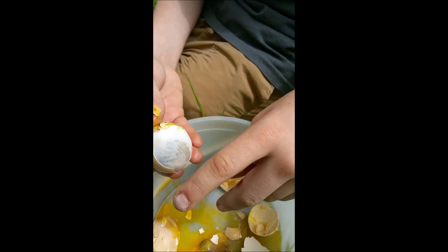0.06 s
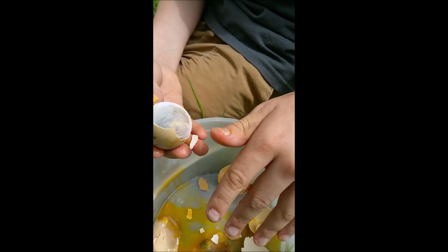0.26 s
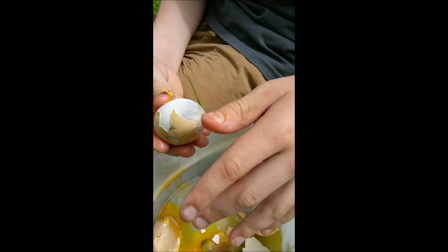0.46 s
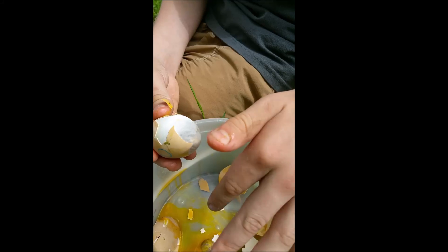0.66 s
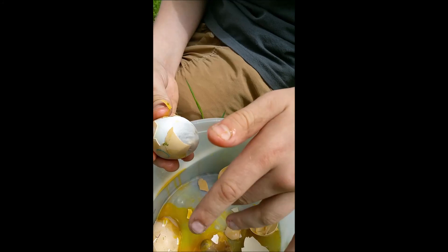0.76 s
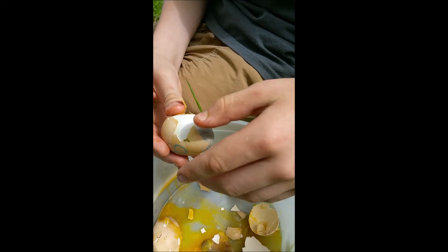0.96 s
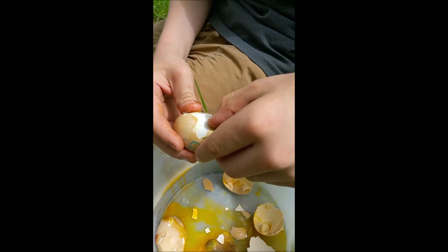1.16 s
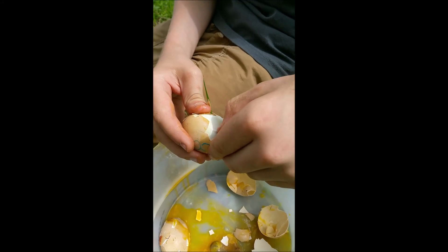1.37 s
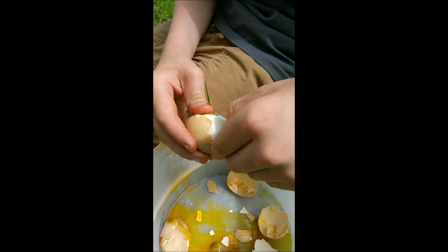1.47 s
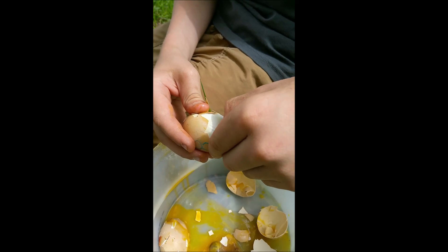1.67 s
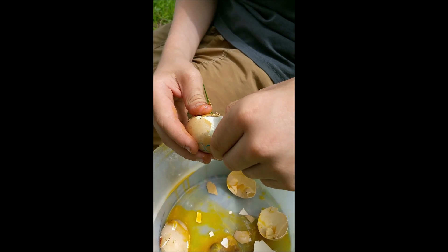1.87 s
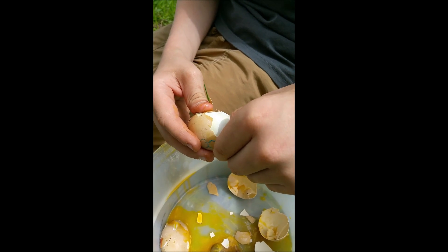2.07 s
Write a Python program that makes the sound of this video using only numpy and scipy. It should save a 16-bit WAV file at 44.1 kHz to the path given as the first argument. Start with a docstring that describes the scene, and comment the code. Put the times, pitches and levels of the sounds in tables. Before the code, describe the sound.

An egg being peeled by hand: one sharp knock and fading rattle of shell in a plastic bowl, a crisp cluster of cracks, faint ticks, then more fine crackling; close stereo phone microphone, quiet outdoors.

```python
"""Fingers drop a piece of eggshell that bounces and rattles in a plastic bowl, then crack and pick bits off an egg.
Outdoors, a phone's stereo microphone close by: bowl, shell and egg are decaying modes, struck by brief
contacts and sprays of tiny fractures. Crumbs slide and crunch; thumps and rings go with the cracks. Beneath
lie far traffic rumble, hum, a soft rustle and microphone hiss made of shaped noise, faint gliding bird
chirps and a breathy whistle of narrow noise bands."""
import sys
import numpy as np
from scipy import signal
from scipy.fft import rfft, irfft
from scipy.io import wavfile
from scipy.ndimage import uniform_filter1d

SR = 44100
rng = np.random.default_rng(int(sys.argv[2]) if len(sys.argv) > 2 else 0)


def ratio(d):
    """dB to gain"""
    e = np.asarray(d, float) / 20
    return 10 ** e


def dump(signal):
    """Clip the signal to [-1, 1] and save it as 16-bit WAV at the path in sys.argv[1]."""
    limited = np.clip(np.atleast_2d(signal).T, -1, 1)
    pcm = np.round(limited * 32767).astype(np.int16)
    wavfile.write(sys.argv[1], SR, pcm)


N = 92610
TIME = np.arange(N) / SR
SIDES = np.array([[.5], [-.5]])  # left, right: shares out a left-minus-right level in dB


def unit(x):
    """Scale to rms 1."""
    return x / np.sqrt(np.mean(x ** 2))


def curve(rows, at, log=False):
    """Read a two-column table at given places, on a log axis if asked."""
    places, values = np.array(rows, float).T
    if log:
        return np.interp(np.log(at + 1), np.log(places + 1), values)
    return np.interp(at, places, values)


def ring(push, hz, t60):
    """One mode struck by a push: it decays by 60 dB in t60 seconds."""
    pole = np.exp(2j * np.pi * min(hz, .45 * SR) / SR - np.log(1000) / (t60 * SR))
    return signal.lfilter([1], [1, -pole], push).imag


def band(hz, width_hz):
    """Noise through a resonance, rms 1."""
    return unit(signal.lfilter(*signal.iirpeak(hz, hz / width_hz, SR), rng.standard_normal(N)))


def walk(rate_hz):
    """Slow random wander, spread 1: noise averaged twice."""
    k = int(SR / rate_hz)
    return unit(uniform_filter1d(uniform_filter1d(rng.standard_normal(N), k), k))


def add(out, start_s, sound, left_lag_s):
    """Mix in a two-channel sound, the left a little later."""
    for side, lag_s in enumerate((left_lag_s, 0)):
        i = int(round((start_s + lag_s) * SR))
        n = min(sound.shape[1], N - i)
        out[side, i:i + n] += sound[side, :n]


# spectrum of far rumble and hiss: pitch_hz, relative level_db (per Hz)
FAR_SPECTRUM = [(13, -49.5), (22, -14), (83, -3.5), (171, -8), (202, -19), (289, -13.5), (323, -38),
                (426, -19.5), (806, -26.5), (3500, -38), (5300, -38.5), (15600, -42.5), (16500, -58.5)]
# likeness of the two microphone sides: pitch_hz, correlation (0-1; below 0 is taken as 0)
FAR_LIKENESS = [(60, 0.91), (130, 0.88), (290, 0.67), (640, 0.43), (1410, -0.01), (3100, -0.08),
                (6820, -0.02), (15000, -0.01)]
# tilt of the far sound to one side: pitch_hz, left_minus_right_db
FAR_BALANCE_ROWS = [(60, 1.5), (110, 1.0), (200, 0.5), (380, -0.5), (700, 0.5), (1290, 0.5), (2380, 2.0),
                    (4400, 0.0), (8120, 2.0), (15000, 1.5)]
# steady hum lines: pitch_hz, level_db
HUM_LINES = [(285.3, -77), (339.1, -80), (430.7, -74.5), (484.5, -83.5)]
# rustle of hands and leaves: time_s, level_db
RUSTLE_LEVEL = [(0, -71.5), (.2, -74), (.33, -69.5), (.6, -74.5), (.85, -72.5), (1.1, -73), (1.33, -73),
                (1.5, -74.5), (1.65, -79.5), (1.95, -80.5), (2.1, -65)]
FAR_DB, HUM_WIDTH_HZ = -60.5, 7.3
RUSTLE_HZ, RUSTLE_WIDTH_HZ = 1800, 1500


def distance():
    """Rumble alike on both sides, hiss unrelated; wavering hum lines and a soft rustle."""
    hz = np.arange(N // 2 + 1) * SR / N
    like = np.clip(curve(FAR_LIKENESS, hz, True), 0, 1)
    # more mid than side noise makes left and right alike
    mid = rfft(rng.standard_normal(N)) * np.sqrt(1 + like)
    side = rfft(rng.standard_normal(N)) * np.sqrt(1 - like)
    shape_db = curve(FAR_SPECTRUM, hz, True) + SIDES * curve(FAR_BALANCE_ROWS, hz, True)
    far = unit(irfft((mid + 2 * SIDES * side) * ratio(shape_db), N))
    hum = sum(ratio(db) * band(pitch_hz, HUM_WIDTH_HZ) for pitch_hz, db in HUM_LINES)
    rustle_noise = np.array([band(RUSTLE_HZ, RUSTLE_WIDTH_HZ) for _ in SIDES])
    rustle = rustle_noise * ratio(curve(RUSTLE_LEVEL, TIME) + 0.5 * walk(28))
    return ratio(FAR_DB) * far + hum + rustle


GRAINS_PER_S, GRAIN_SPREAD_DB = 6900, 5.5
GRAIN_CAP = 2.2  # no fracture rises above the smallest by more than this many spreads


def crackle(t, t60, smallest_db):
    """One snap, then a fading spray of smaller fractures at random instants."""
    chance, sign, size = rng.random((3, len(t)))
    rise_db = GRAIN_SPREAD_DB * np.minimum(-np.log(1 - size), GRAIN_CAP)
    grains = (chance < GRAINS_PER_S / SR) * np.sign(sign - .5) * ratio(smallest_db + rise_db)
    return grains * ratio(-60 * t / t60) + (t == 0)


PIECE_DETUNE, PIECE_SPREAD_DB = .03, 2  # random spread of pitch (as a fraction) and of level on each side


def piece(push, modes, tilt_db=0):
    """Modes of one bit of shell, each bit tuned and turned differently; energy of rms 1 held for 5 ms."""
    draws = rng.standard_normal((len(modes), 3))
    sound = 0
    for k, ((hz, db, t60, pan_db), draw) in enumerate(zip(modes, draws)):
        tilted_db = db + tilt_db * np.log2(hz / 3000)
        gain = ratio(tilted_db + pan_db * SIDES + PIECE_SPREAD_DB * draw[1:, None])
        sound = sound + (-1) ** k * gain * ring(push, hz * (1 + PIECE_DETUNE * draw[0]), t60)
    return sound / np.sqrt(np.sum(sound ** 2) / SR / .01)  # 5 ms on each of two sides


# shell piece hitting the bowl: start_s, level_db, deep_ring_db, tick_db, left_minus_right_db (of the bowl)
SHELL_BOUNCES = [(0.2287, -21, 2, -5.5, 5), (.2410, -14, -19, -13, -1), (0.245, -26.5, -22.5, -4, 4),
                 (0.3449, -42.5, -13, -5, 7), (0.3537, -32.5, -28, -4, -3), (0.3647, -27, -35, -10, 1.5),
                 (0.3783, -39.5, -24, -7, -5), (0.3952, -45, -20, -13, 2), (0.403, -35.5, -18, -20, 2),
                 (0.4051, -38.5, -32, -7, 4), (0.418, -44.5, -9, -18, 0), (0.4244, -45.5, -10, -16.5, 0),
                 (0.4355, -40, -12, -10, 3), (0.4424, -48.5, -12, -15, 1), (0.4696, -47.5, -12, -23, 1),
                 (0.4963, -51, -12, -23, 2), (.5104, -53, -13, -29, 3), (.517, -61, -10, -29, 2),
                 (0.527, -54.5, -16, -28.5, 3), (0.5343, -56.5, -15, -30, 1), (.545, -58, -12, -30, 0),
                 (0.5523, -60.5, -12, -30, -2)]
# modes of the plastic bowl: pitch_hz, level_db, t60_s
BOWL_MODES = [(529, -12, .05), (1151, 3.5, 0.023), (1346, -9, 0.014), (1598, -5.5, 0.014),
              (1860, -5, 0.021), (2210, -14.5, 0.0091), (2302, -18.5, .015), (2733, -3, .012),
              (3680, -5, 0.0033), (3800, -10, 0.029)]
# deep bowl modes, as strong as the blow is central: pitch_hz, level_db, t60_s
BOWL_DEEP_MODES = [(495, -2.5, 0.012), (630, -0.5, 0.022), (860.5, -7, 0.014)]
# brief ringing of shell and fingers, also in crumbs and cracks: pitch_hz, relative level_db, t60_s,
# left_minus_right_db
SHELL_MODES = [(1509, -5.5, 0.0091, -6), (1820, -3.5, 0.0079, 2.5), (2350, 1.5, 0.0055, 2.5),
               (2863, 0, 0.0085, 0), (3517, 1, 0.0079, -0.5), (4260, 4.5, .004, -6),
               (4956, 7.5, 0.0039, -2), (5700, 4.5, 0.0031, -18.5), (6760, 5.5, 0.0019, -22),
               (7010, 4, 0.0034, -6.5)]
# spit into the air, also in cracks: pitch_hz, relative level_db, t60_s, left_minus_right_db
AIR_MODES = [(7970, 0.14, 0.00078, -1), (10160, 0.023, 0.0016, 0.5), (12270, 0.91, 0.0017, -2.5),
             (13800, 0.96, 0.0015, -2.5), (15200, 0.9, 0.0014, -3)]
CONTACT_AT_0_DB_S = 0.00019
SOFTENING = .2  # contact lasts as blow strength to the minus this power
TICK_T60_S, SCRAPE_T60_S = 0.0069, 0.026
GRAIN_DB, SCRAPE_DB, RATTLE_DB = -7.5, -16.5, -12  # smallest tick and scrape fractures; their push on the bowl
TICK_TILT_DB = -3  # per octave
TICK_AIR_DB = -3.5
AIR_FADE = .3  # dB of air lost per dB that a bounce is weaker
BOWL_LAG_S, SHELL_LAG_S, AIR_LAG_S = .0001, .00005, .00002  # the left side hears each this much later


def bowl():
    """Each bounce pushes the bowl's modes; the light shell ticks and scrapes on top."""
    out, t = np.zeros((2, N)), TIME[:6000]
    for start_s, db, deep_db, tick_db, pan_db in SHELL_BOUNCES:
        contact_s = CONTACT_AT_0_DB_S * ratio(-SOFTENING * db)
        touch = np.sin(np.pi * np.arange(0, contact_s, 1 / SR) / contact_s)
        snap = crackle(t, TICK_T60_S, GRAIN_DB) + crackle(t, SCRAPE_T60_S, SCRAPE_DB)
        blow_and_rattle = (t == 0) + ratio(RATTLE_DB) * snap * (t > 0)
        push = signal.lfilter(-touch / touch.sum(), 1, blow_and_rattle)
        modes = [(hz, mode_db + deep_db, t60) for hz, mode_db, t60 in BOWL_DEEP_MODES] + BOWL_MODES
        body = sum(ratio(mode_db) * ring(push, hz, t60) for hz, mode_db, t60 in modes)
        tick = piece(snap, SHELL_MODES, TICK_TILT_DB)
        air = piece(snap, AIR_MODES)
        add(out, start_s, ratio(db + pan_db * SIDES) * body, BOWL_LAG_S)
        add(out, start_s, ratio(db + tick_db) * tick, SHELL_LAG_S)
        add(out, start_s, ratio((1 + AIR_FADE) * db + tick_db + TICK_AIR_DB) * air, AIR_LAG_S)
    return out


# fine crumbs of shell slide or crunch: start_s, length_s, level_db, brightness_db_per_octave
CRUMB_SLIDES = [(0.346, 0.041, -51, -9.5), (0.393, 0.056, -55, -13), (1.862, .04, -59, -5.5),
                (2.066, 0.037, -56, 5.5)]


def crumbs():
    """A spray of tiny fractures, sinking slightly, while bits slide or get crushed."""
    out = np.zeros((2, N))
    for start_s, length_s, db, tilt_db in CRUMB_SLIDES:
        t = TIME[:int(length_s * SR)]
        spray = crackle(t, np.inf, 0) * np.sqrt(1 - t / length_s / 2) * (t > 0)
        add(out, start_s, ratio(db) * unit(piece(spray, SHELL_MODES, tilt_db)), SHELL_LAG_S)
    return out


# bird chirps: start_s, length_s, start_pitch_hz, end_pitch_hz, level_db (before flutter)
BIRD_CHIRPS = [(.57, .03, 4050, 4100, -78), (1.35, 0.032, 3800, 4100, -79), (1.59, 0.03, 5500, 4900, -77),
               (1.568, .022, 3500, 3100, -77), (1.698, 0.045, 4800, 4600, -75.5),
               (1.694, 0.03, 3930, 3900, -73), (1.77, 0.027, 5550, 4800, -73),
               (1.964, 0.015, 5300, 4800, -73)]
CHIRP_FLUTTER_DB = 3  # leaves and distance make the chirps waver


def birds():
    """Far chirps: gliding sines that swell and fade, wavering in level."""
    out = np.zeros(N)
    flutter_db = CHIRP_FLUTTER_DB * walk(150)
    for start_s, length_s, start_hz, end_hz, db in BIRD_CHIRPS:
        progress = np.clip((TIME - start_s) / length_s, 0, 1)
        phase = 2 * np.pi * np.cumsum(start_hz + (end_hz - start_hz) * progress) / SR
        out += ratio(db + flutter_db) * np.sin(np.pi * progress) * np.sin(phase)
    return out


# swell of a faint breathy whistle: time_s, level_db
WHISTLE_LEVEL = [(.6, -102.5), (.68, -83), (.75, -77.5), (.84, -79.5), (.88, -78), (.91, -91)]
# its noise bands: pitch_hz, width_hz, relative level_db
WHISTLE_NOISE = [(1004, 21, 4), (3730, 200, 0), (4024, 80, -1.5)]


def whistle():
    """Narrow bands of noise swell and fade together."""
    breath = sum(ratio(db) * band(hz, width_hz) for hz, width_hz, db in WHISTLE_NOISE)
    return ratio(curve(WHISTLE_LEVEL, TIME)) * breath


# cracks of the shell: start_s, level_db, crackle_t60_s, brightness_db_per_octave, egg_body_db, air_db,
# left_minus_right_db
SHELL_CRACKS = [(0.873, -70.5, .03, 6, -27, -8, -1), (0.8967, -37.5, 0.011, -4, -30, -6, -2),
                (0.899, -31.5, 0.009, -1, -25, -9.5, 0), (.9013, -32, 0.015, -0.5, -5, -12, -6.5),
                (0.9048, -36.5, 0.017, -8, -10.5, -7, 5), (0.9186, -42.5, 0.013, -4, -14, -8, 2),
                (0.9294, -37, 0.014, -2.5, -9.5, -8.5, -2.5), (0.9685, -60.5, 0.013, 5, -4.5, -11, -4),
                (0.9996, -52, 0.017, 10, -11, -6, -5), (1.004, -55.5, 0.0082, -16, -10, -13, 21),
                (1.01, -57.5, 0.017, -2, -11.5, -4, -15), (1.0358, -61, 0.026, -3, -13, -4.5, -4),
                (1.1084, -66, 0.03, -13, 0, -8, 1.5), (1.1782, -58.5, 0.021, 2, -10, 0.5, -6),
                (1.184, -58.5, 0.01, 1.5, -15, -18, 9.5), (1.327, -65, 0.044, -1, -17, -7, -7.5),
                (1.34, -70, .02, 6, -12, -5.5, 20.5), (1.4039, -65.5, 0.011, -7, 5.5, 0, 1),
                (1.5076, -51.5, 0.026, -0.5, -12.5, -2, -1), (1.531, -69, 0.022, 1, -15, -7, -8.5),
                (1.8650, -49, 0.012, 1, -39, -5, -7.5), (1.8679, -46.5, 0.019, 2, -45, 6.5, -3),
                (1.8780, -58.5, 0.044, -2.5, 0, -6, 2), (1.8891, -46, 0.011, 4, -11.5, -6, -3),
                (1.8911, -42, 0.014, 4.5, -35, -2.5, 3.5), (1.9163, -51.5, 0.019, 4, -23, -4, -3),
                (1.9921, -37, 0.012, 9, -13, -12, -3), (1.9965, -53, 0.0087, 6.5, -28.5, -21, -4),
                (2.0424, -52, .015, 2, -19, -12, -1.5), (2.0655, -49.5, 0.029, -4, 1.5, -8.5, 0.5),
                (2.071, -53, 0.021, 3, -29, -10, 1), (2.077, -51.5, 0.016, -2, -21, -9, 13),
                (2.0836, -49.5, 0.018, -1, -14, -8, 10), (2.0920, -45, 0.0096, 9, -20, -7.5, -3)]
# modes of the egg's body: pitch_hz, relative level_db, t60_s, left_minus_right_db
EGG_MODES = [(907, -2.1, 0.0075, 0.6), (1190, 1, 0.0073, 0.91)]


def cracks():
    """Fractures ring the shell and the egg and spit into the air."""
    out, t = np.zeros((2, N)), TIME[:4000]
    for start_s, db, t60, tilt_db, egg_db, air_db, pan_db in SHELL_CRACKS:
        snap = crackle(t, t60, GRAIN_DB)
        shell = piece(snap, SHELL_MODES, tilt_db)
        egg = piece(1. * (t == 0), EGG_MODES)
        air = piece(snap, AIR_MODES)
        add(out, start_s, ratio(db + pan_db * SIDES) * (shell + ratio(egg_db) * egg), SHELL_LAG_S)
        add(out, start_s, ratio(db + air_db + pan_db * SIDES) * air, AIR_LAG_S)
    return out


# thumps and rings of egg and shell as they crack: start_s, level_db, pitch_hz, t60_s
CRACK_RINGS = [(0.901, -30, 411, 0.04), (0.9293, -38, 446, 0.028), (1.8680, -37, 2350, 0.024),
               (1.868, -44, 1440, 0.021), (2.066, -46, 434, 0.021)]


def thumps_and_rings():
    """Thumps and rings of egg and shell as they crack: each row one decaying mode, 1 dB louder on the left."""
    out, t = np.zeros((2, N)), TIME[:4000]
    for start_s, db, hz, t60 in CRACK_RINGS:
        add(out, start_s, ratio(db + SIDES) * ring(1. * (t == 0), hz, t60), BOWL_LAG_S)
    return out


SMALL_HZ = 298  # small things send out little below this


def scene():
    """Bowl, crumbs, cracks and their thumps without deep bass, over birds, whistle and distance."""
    far = distance()
    highpass = signal.butter(2, SMALL_HZ, "high", fs=SR, output="sos")
    near = signal.sosfilt(highpass, bowl() + crumbs() + cracks() + thumps_and_rings())
    return near + birds() + whistle() + far


def top_cut(x):
    """Nothing passes above the cut-off."""
    return signal.sosfilt(signal.butter(12, 16820, fs=SR, output="sos"), x)


def record(dry):
    """The phone cuts the top steeply above 16.3 kHz."""
    lowpass = signal.ellip(6, .5, 50, 16300, fs=SR, output="sos")
    mix = signal.sosfilt(lowpass, dry)
    return top_cut(mix)


dry = scene()
out = record(dry)
dump(out)
```